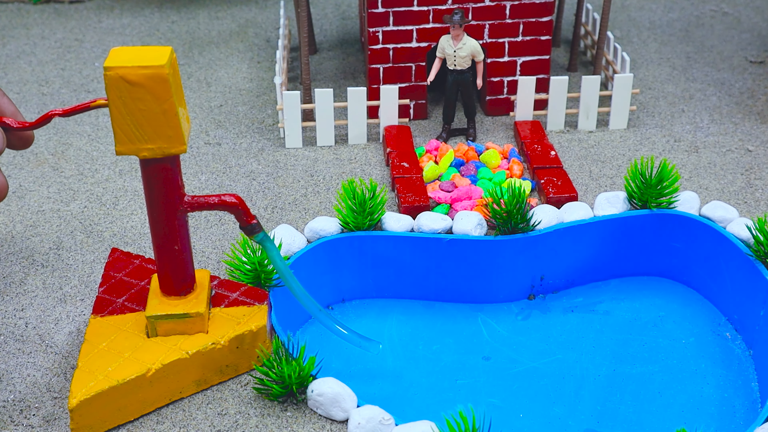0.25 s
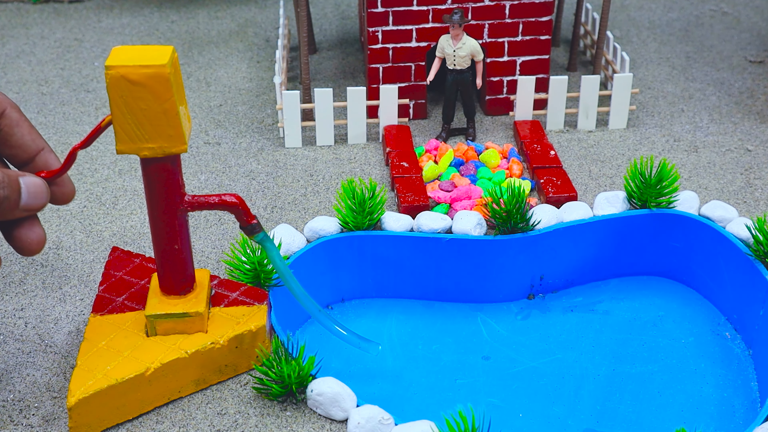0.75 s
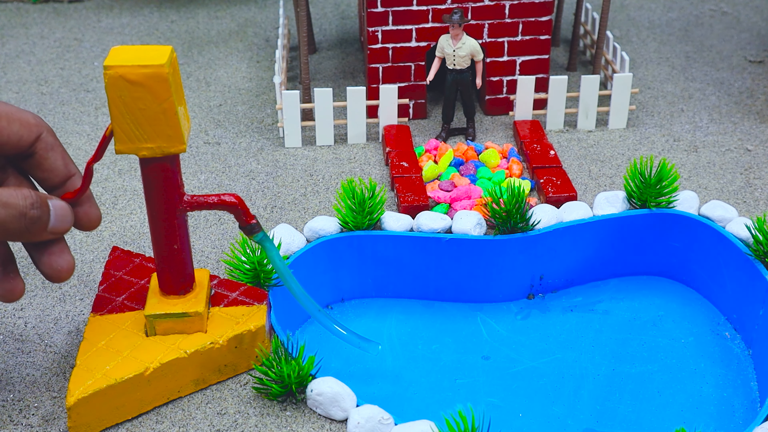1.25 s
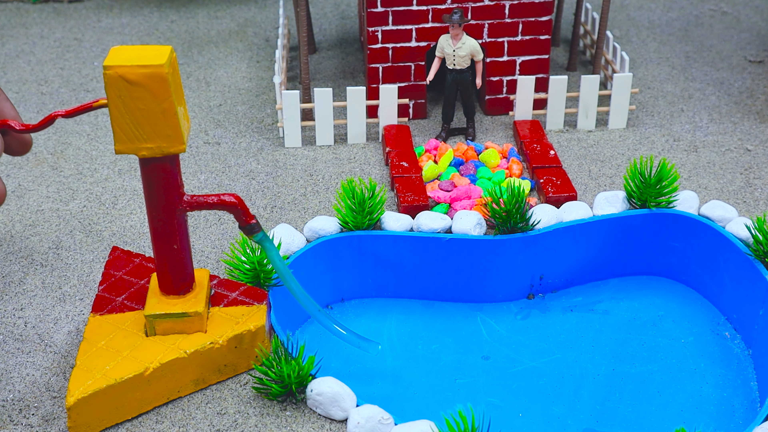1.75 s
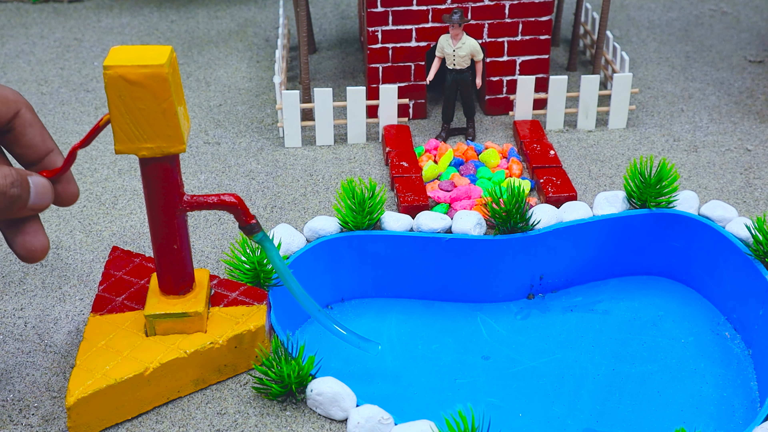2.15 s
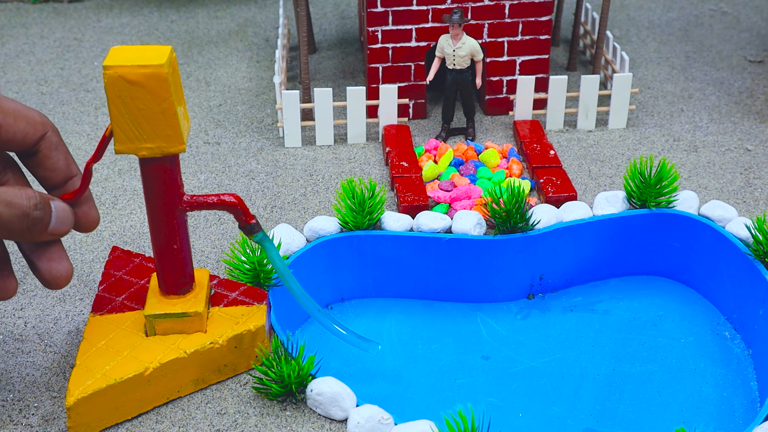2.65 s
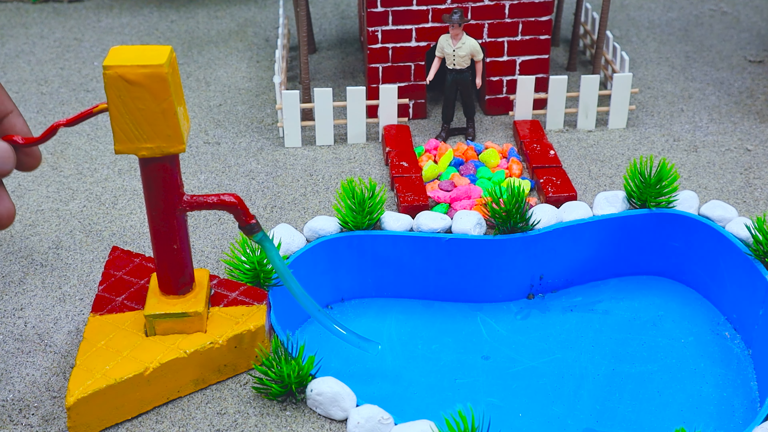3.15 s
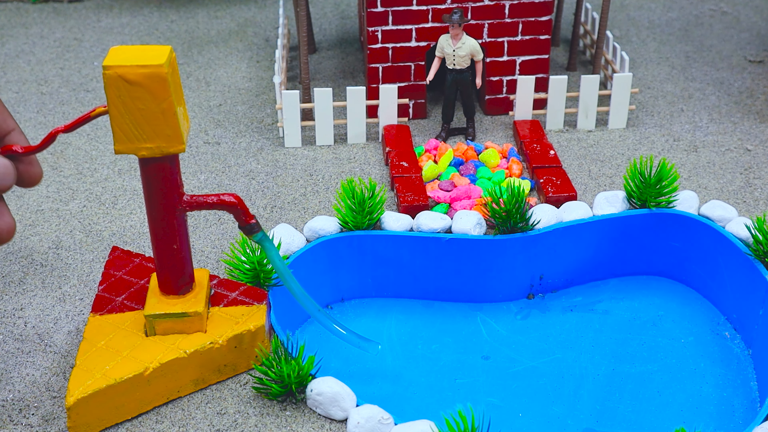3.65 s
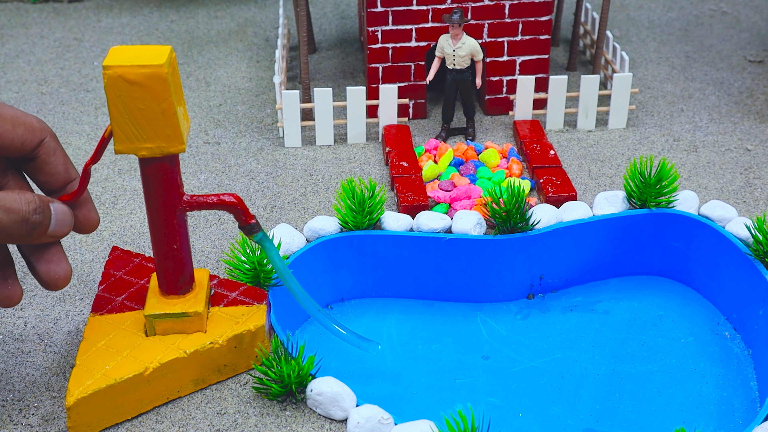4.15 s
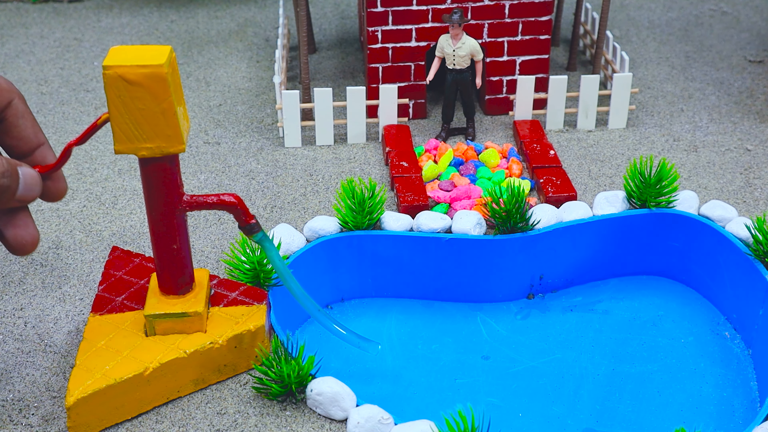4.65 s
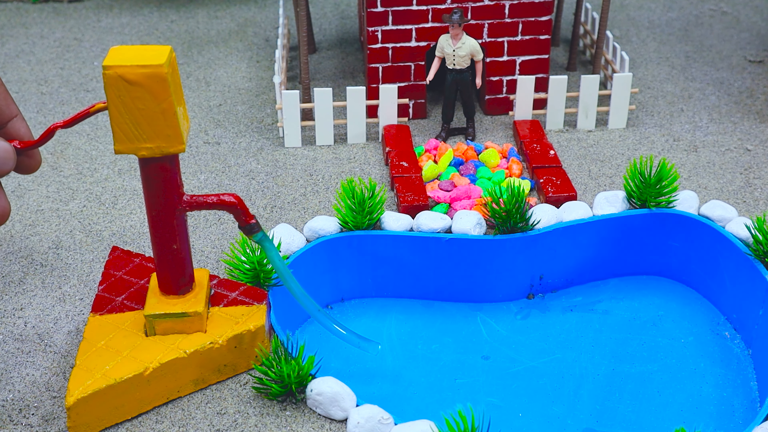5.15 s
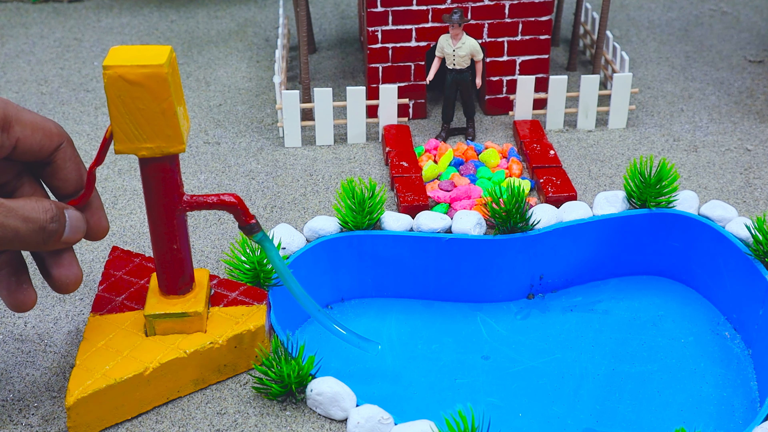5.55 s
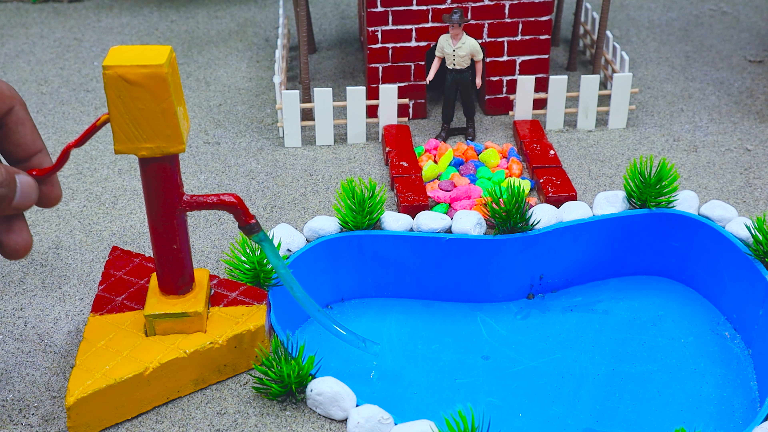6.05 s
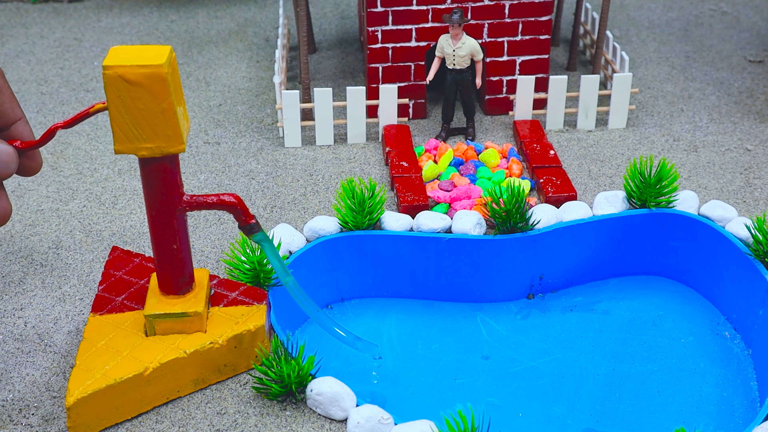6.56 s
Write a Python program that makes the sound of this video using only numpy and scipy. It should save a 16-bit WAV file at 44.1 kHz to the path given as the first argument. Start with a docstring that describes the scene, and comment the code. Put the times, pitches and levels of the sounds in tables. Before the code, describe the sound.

Bright birdsong with trills and echo over light pump clicks and thin dribbling water, ending in a sudden close gurgling splash.

```python
"""Beside a plastic pond a toy hand pump is worked close to the microphone: knocks, ticks, clacks and squeaks
come from decaying tones, gliding tones and noise bursts; a thin stream trickles as small bubbles and noise.
A songbird farther off whistles and chirps in gliding sines, with an echo and a long diffuse tail.
Near the end the water breaks into a splash of bubbles, slaps and glugs over a low rumble."""
import sys
import numpy as np
from scipy import signal
from scipy.fft import rfft, irfft, next_fast_len
from scipy.io import wavfile

SR = 44100
rng = np.random.default_rng(int(sys.argv[2]) if len(sys.argv) > 2 else 0)


def waveform_to_disk(signal):
    """Save audio, clipped to [-1, 1], as 16-bit WAV at the path in sys.argv[1]."""
    frames = np.transpose(np.atleast_2d(signal))
    scaled = np.clip(frames, -1, 1) * 32767
    samples = np.round(scaled).astype(np.int16)
    wavfile.write(sys.argv[1], SR, samples)


N = 300321
TIME = np.arange(N) / SR

# All table levels are relative; the layers add their own trims.
# The handle hits its stops. Each row: start in seconds, force in dB, hollow body in dB,
# casing ring in dB, thump of the base in dB.
KNOCKS = [(.143, -37, -55, -48, -32.5), (.167, -33.5, -35.5, -39, -48), (.274, -42, -42, -56, -39),
          (.372, -33, -39, -24.5, -30.5), (.728, -27, -38, -43, -31.5), (.8, -35, -29.5, -30, -42),
          (.83, -31, -39, -37, -34), (1.001, -37.5, -27.5, -23.5, -34), (2.299, -40, -38, -51, -37),
          (2.484, -40.5, -45, -63, -36), (2.576, -36.5, -41, -23.5, -42), (2.926, -28, -37.5, -39, -37),
          (2.948, -29, -43, -34, -31.5), (3.221, -43, -44, -37, -53), (4.585, -39, -44, -50, -40),
          (4.901, -37, -44.5, -30.5, -36.5), (5.291, -33, -29.5, -38, -34.5), (5.364, -35, -46, -39, -35.5),
          (5.402, -35, -40, -25, -33), (5.551, -39, -41, -33, -38)]
# Light ticks of the linkage. Each row: start in seconds, level in dB.
TICKS = [(.065, -26.5), (.118, -29), (.165, -20.5), (.83, -16), (.944, -24), (2.065, -30), (2.116, -27),
         (2.238, -18.5), (2.337, -15.5), (3.13, -26.5), (4.432, -25), (4.522, -20.5), (4.584, -26),
         (4.632, -14), (5.363, -23.5)]
# Large single bubbles. Each row: start in seconds, level in dB, starting pitch in Hz.
PLOPS = [(4.734, -26, 2880), (4.859, -28, 1400), (5.126, -30.5, 2150), (6.086, -23, 2380),
         (6.097, -21, 776), (6.151, -24.5, 2540), (6.186, -18, 2450), (6.305, -23, 1063), (6.336, -24, 777),
         (6.392, -22, 2440), (6.4, -17.5, 1180), (6.425, -16.5, 1594), (6.542, -18, 1123),
         (6.574, -11.5, 2880), (6.629, -15, 2540), (6.697, -18, 3070), (6.799, -20, 1060)]
# Ringing of the pump casing. Each row: resonance in Hz, width in Hz, level in dB.
CASING = [(727, 133, -3), (1136, 260, 1.5), (2117, 200, 3), (3140, 180, 1), (3770, 800, -6.5),
          (5500, 710, -8.5)]
BODY_HZ, BODY_T60_S, THUMP_HZ = 397.6, 0.16, 74
RING_HZ, RING_T60_S = 1224, 0.068
KNOCK_CRACK_HZ = 1390  # sets the crack band, from 0.5 to 0.94 of this
# Strength of the thin stream. Each row: time in seconds, bubbling in dB, spray in dB.
TRICKLE = [(0.0, -53.5, -69), (0.62, -57.5, -71), (0.92, -53.5, -67.5), (1.12, -57, -72),
           (1.55, -59.5, -71), (1.8, -53.5, -66.5), (2.26, -52.5, -63.5), (2.51, -54.5, -69.5),
           (2.74, -56, -74), (2.89, -56, -68.5), (3.36, -59.5, -66.5), (3.72, -62.5, -72),
           (3.86, -57, -69.5), (4.61, -52.5, -68.5), (5.65, -61, -70.5), (6.0, -60, -70)]
# Strength of the full stream. Each row: time in seconds, bubbling in dB, spray in dB.
SPLASH = [(6.03, -38.5, -52), (6.25, -37, -57.5), (6.4, -33, -54), (6.6, -36, -52), (6.81, -37, -56)]
SPLASH_START_S = 6.028
# Colour of the thin stream. Each row: frequency in Hz, density in dB per Hz.
TRICKLE_COLOUR = [(120, -3), (200, -6), (400, 3), (507, 1.5), (744, 0), (1070, -3), (1410, -6), (3380, 2.5),
                  (4060, -3), (5050, -13.5), (6290, -17.5), (15700, -52)]
# Colour of the full stream. Each row: frequency in Hz, density in dB per Hz.
SPLASH_COLOUR = [(200, -32), (450, -2), (800, 0.5), (1300, 0), (2500, -3.5), (4000, -7.5), (7000, -15),
                 (10000, -27.5), (15000, -20.5)]
# Colour of the spray. Each row: frequency in Hz, density in dB per Hz.
SPRAY_COLOUR = [(2000, -41), (4500, 2.5), (7000, 3.5), (10000, -2.5), (15500, -12)]
# Colour of the low rumble. Each row: frequency in Hz, density in dB per Hz.
RUMBLE_COLOUR = [(20, 0), (40, -7.5), (70, -3), (110, -7.5), (180, -12.5), (300, -18.5), (600, -41),
                 (2000, -72)]
# Open air round the bird. Each row: frequency in Hz, time to fall 60 dB in seconds.
AIR_T60 = [(2000, 0.36), (4000, 0.76), (6000, 0.99), (8500, 0.34)]
CUTOFF_HZ = 15800
# The song's level tilts between left and right over time. Each row: time in seconds, left minus right in dB.
BIRD_PAN = [(0.0, -4), (0.15, 7), (0.24, -11), (0.36, 7), (0.49, -1.5), (0.57, 9), (0.72, 4.5), (1.15, 5.5),
            (1.23, 2), (1.7, 6), (2.54, -3.5), (3.92, -4.0), (5.38, -7), (5.64, -10), (5.81, 1), (6.8, 1.0)]
# Drops slapping the pond. Each row: start in seconds, level in dB.
SLAPS = [(6.037, -14.5), (6.047, -15.5), (6.121, -19.5), (6.272, -20), (6.338, -28), (6.399, -16),
         (6.426, -6.5), (6.509, -16), (6.542, -24), (6.63, -7), (6.653, -18), (6.762, -30)]
# Squeaks of the handle pivot. Each row: start in seconds, length in seconds, start pitch in Hz,
# end pitch in Hz, level in dB.
SQUEAKS = [(0.831, 0.036, 2244, 1950, -24.5), (3.011, 0.023, 2187, 1970, -28)]
# Soft low swells. Each row: middle in seconds, length in seconds, centre in Hz, width in Hz, level in dB.
PUFFS = [(.35, .09, 400, 30, -43), (.55, .11, 377, 60, -43.5), (1.769, 0.24, 617, 503, -47),
         (3.783, .12, 646, 500, -44.5), (4.35, .9, 184, 44.7, -59.5), (5.2, 0.87, 138, 34.8, -56.5)]
# Drops pattering on the pond as the stream wavers. Each row: time in seconds, level in dB.
PATTER = [(0, -70), (1.7, -56.5), (2.4, -49.5), (2.8, -54.5), (3.7, -66), (3.95, -50.5), (4.55, -43),
          (5.2, -53.5), (6.0, -72)]
# Colour of the patter. Each row: frequency in Hz, density in dB per Hz.
PATTER_COLOUR = [(600, -30), (1200, -1), (1800, 9), (3000, -5.5), (5000, -4.5), (7000, -14.5),
                 (12000, -23.5)]
# The bird's held whistles. Each row: start in seconds, length in seconds, middle pitch in Hz,
# level in dB, warble as a share of pitch (a slight common warble is added to all notes).
WHISTLES = [(.203, 0.092, 3883, -29, 0.0049), (.727, 0.062, 3893, -23.5, 0.012),
            (1.194, 0.077, 3896, -27, 0.004), (2.404, 0.35, 8570, -39.5, 0.0098),
            (2.479, 0.16, 7050, -45, .015), (2.992, 0.056, 4416, -27, 0.012), (3.1, 0.12, 3482, -31, 0),
            (3.133, 0.066, 3982, -30, 0), (3.63, 0.073, 3943, -31, 0), (4.144, 0.059, 3896, -28.5, 0.0069),
            (5.599, .055, 3250, -43.5, 0.045), (5.712, .032, 4900, -45, 0.031)]
# Slurs that drop a little and level out. Each row: start in seconds, length in seconds,
# middle pitch in Hz, level in dB, warble as a share of pitch.
SLURS = [(0, .017, 4440, -31.5, 0.036), (.07, 0.041, 7200, -50, .034), (.125, .1, 5400, -41.5, 0.057),
         (.327, .04, 7120, -47, 0.033), (.396, .065, 5070, -35.5, 0.063), (.419, .08, 4415, -30, .02),
         (.915, .068, 4520, -29.5, 0.033), (1.2, .047, 4680, -37.5, 0.093), (3.05, 0.0577, 3494, -28, .002),
         (3.353, .076, 4453, -33, 0.016), (3.854, .051, 4500, -29, 0.026),
         (4.384, .061, 4450, -32.5, 0.023)]
# Slides down. Each row: start in seconds, length in seconds, middle pitch in Hz, level in dB,
# warble as a share of pitch.
SLIDES = [(1.427, 0.079, 4410, -30.5, 0.038), (3.395, .135, 7550, -36.5, .011),
          (3.561, .055, 7900, -44, .005), (3.617, .063, 6650, -34.5, 0.029),
          (3.745, 0.067, 5700, -34, 0.03), (3.951, .026, 3640, -28.5, 0.079),
          (4.03, 0.039, 3490, -30, 0.059), (5.454, 0.064, 3405, -42, 0.073)]
# Steep buzzy sweeps down. Each row: start in seconds, length in seconds, middle pitch in Hz,
# level in dB, warble as a share of pitch.
SWEEPS = [(1.283, 0.052, 3110, -27.5, .035), (1.463, .023, 6150, -40.5, .06),
          (1.493, 0.08, 3400, -26, .045), (1.696, 0.041, 6280, -40.5, 0.053),
          (1.718, 0.095, 3622, -26, 0.079), (1.99, .12, 2833, -30.5, 0.088),
          (3.861, 0.03, 3590, -35, 0.088)]
# Quick flicks up. Each row: start in seconds, length in seconds, middle pitch in Hz, level in dB,
# warble as a share of pitch.
FLICKS = [(1.0, 0.056, 3020, -41, .01), (1.954, .044, 3236, -23.5, 0.043)]
# Glide of each kind: start and end in semitones from the middle pitch.
WHISTLE_SHAPE, SLUR_SHAPE, SLIDE_SHAPE = (0.257, -0.245), (1.315, -0.023), (2, -1.19)
SWEEP_SHAPE, FLICK_SHAPE = (3.4, -10.5), (-4.5, 3.7)
# Soft motif for a trill. Each row: delay in seconds, length in seconds, start pitch in Hz,
# middle pitch in Hz, end pitch in Hz, level in dB, warble as a share of pitch.
SOFT_MOTIF = [(0, .02, 4450, 3670, 3000, -4, 0.018), (.028, .048, 2874, 3350, 4270, -0.5, 0.013)]
# Hooked motif for a trill. Each row: as in the soft motif (seconds, seconds, Hz, Hz, Hz, dB, share).
HOOK_MOTIF = [(0, .036, 4750, 4000, 3920, 0, 0.015)]
# High motif for a trill. Each row: as in the soft motif (seconds, seconds, Hz, Hz, Hz, dB, share).
HIGH_MOTIF = [(0, .031, 4700, 6450, 7980, -0.17, 0.06), (.077, .027, 6550, 5950, 5370, -0.13, .03)]
# Loud motif for a trill. Each row: as in the soft motif (seconds, seconds, Hz, Hz, Hz, dB, share).
LOUD_MOTIF = [(0, 0.02, 5270, 5110, 4940, -5.5, .025), (.038, .024, 5300, 4025, 3310, 1, 0.0067),
              (.066, .033, 3600, 4300, 5850, -0.5, .04)]
HOOK_START_S, HOOK_PERIOD_S = .545, .075
# Play in the linkage takes up with a dry clack. Each row: start in seconds, force in dB,
# crack reference in Hz (its band runs from 0.5 to 0.94 of this).
CLACKS = [(.183, -33.5, 1480), (.741, -29, 3900), (2.335, -34.5, 2240), (2.353, -32.5, 2300),
          (2.898, -38.5, 2080), (3.017, -30, 3600), (4.632, -35.5, 5000), (4.655, -32, 3170),
          (5.284, -34.5, 3495)]
# Strength of the low rumble. Each row: time in seconds, level in dB.
RUMBLE = [(0, -53), (.4, -50), (.9, -55.5), (1.2, -61.5), (1.9, -64.5), (2.3, -54), (2.8, -53),
          (3.7, -66.5), (4.4, -58.5), (5.05, -53), (5.7, -59), (6, -63)]
# Air pockets dug by the full stream, whose pitch bends as they open and close. Each row: start in seconds,
# length in seconds, start pitch in Hz, end pitch in Hz, level in dB.
GLUGS = [(6.1, 0.048, 787, 515, -30.5), (6.304, .025, 1100, 680, -27.5), (6.324, .03, 600, 855, -30.5),
         (6.4, 0.0403, 1245, 963, -29), (6.43, .07, 704, 513, -33.5), (6.521, 0.044, 896, 1516, -25),
         (6.625, 0.0303, 1450, 994, -30.5), (6.67, .028, 857, 950, -30.5), (6.769, 0.039, 846, 1153, -30.5)]


def from_db(db):
    """Decibels to gain."""
    return 10 ** (np.asarray(db) / 20)


def rms_one(x):
    """Scale to unit power."""
    return x / np.sqrt(np.mean(x ** 2) + 1e-20)


def in_time(rows):
    """Curve rows to one value per sample and column."""
    s, *columns = np.transpose(rows)
    return [np.interp(TIME, s, c) for c in columns]


def at_hz(points, hz):
    """Read a table on a log-frequency axis."""
    table_hz, values = np.array(points).T
    return np.interp(np.log(hz + 1e-9), np.log(table_hz), values)


def add(track, s, sound):
    """Mix a sound in at a time."""
    i = max(int(s * SR), 0)
    part = sound[..., :max(N - i, 0)]
    track[..., i:i + part.shape[-1]] += part


def band(x, low_hz, high_hz):
    """Gentle band-pass."""
    sos = signal.butter(2, [low_hz, min(high_hz, .45 * SR)], "band", fs=SR, output="sos")
    return signal.sosfilt(sos, x)


def resonance(x, hz, width_hz):
    """Two-pole resonance with gain 1 on top."""
    r = np.exp(-np.pi * width_hz / SR)
    top = np.array([1, 0, -1]) * (1 - r * r) / 2
    return signal.lfilter(top, [1, -2 * r * np.cos(2 * np.pi * hz / SR), r * r], x)


def spread(pair, side_db):
    """A middle and a side signal to left and right."""
    return pair[0] + from_db(side_db) * pair[1] * np.array([[1], [-1]])


def pan(db):
    """Left and right gains for a level difference."""
    return from_db(np.array([[db], [-db]]) / 2)


def wash(colour, side_db):
    """Stereo noise of a given colour that falls away below its lowest point."""
    size = next_fast_len(N, real=True)
    hz = np.arange(size // 2 + 1) * SR / size
    gain = from_db(at_hz(colour, hz)) * np.minimum(hz / colour[0][0], 1) ** 2
    noise = irfft(rfft(rng.standard_normal((2, size))) * gain, size)[:, :N]
    return rms_one(spread(noise, side_db))


def reverberate(x, t60_table, delay_s, side_db):
    """Diffuse stereo tail that builds up over delay_s and whose bands die at their own rates."""
    t = TIME[:SR]
    edges = np.geomspace(150, 15000, 9)
    tail = np.zeros((2, SR))
    for low_hz, high_hz in zip(edges, edges[1:]):
        t60 = at_hz(t60_table, np.sqrt(low_hz * high_hz))
        tail += band(rng.standard_normal((2, SR)), low_hz, high_hz) * from_db(-60 * t / t60)
    tail = spread(tail, side_db) * np.minimum(t / delay_s, 1)
    return signal.fftconvolve(x[None], rms_one(tail) / np.sqrt(SR), axes=1)[:, :N]


def trill(motif, start_s, period_s, level_db, growth_db, count):
    """A motif repeats at an even pace, louder each time."""
    return [(start_s + k * period_s + delay, length, start_hz, middle_hz, end_hz,
             level_db + k * growth_db + db, warble)
            for k in range(count)
            for delay, length, start_hz, middle_hz, end_hz, db, warble in motif]


def notes(rows, shape):
    """Notes of one kind share their glide."""
    start, end = shape
    return [(s, length, hz * 2 ** (start / 12), hz, hz * 2 ** (end / 12), db, warble)
            for s, length, hz, db, warble in rows]


def song():
    """Two trills open the song, single notes run among and after them, a high and a loud trill close it."""
    opening = (trill(SOFT_MOTIF, start_s=-0.013, period_s=.17, level_db=-43, growth_db=1.3, count=4)
               + trill(HOOK_MOTIF, HOOK_START_S, HOOK_PERIOD_S, level_db=-31, growth_db=0.2, count=9))
    singles = (notes(WHISTLES, WHISTLE_SHAPE) + notes(SLURS, SLUR_SHAPE) + notes(SLIDES, SLIDE_SHAPE)
               + notes(SWEEPS, SWEEP_SHAPE) + notes(FLICKS, FLICK_SHAPE))
    closing = (trill(HIGH_MOTIF, start_s=5.803, period_s=.106, level_db=-41, growth_db=2.0, count=6)
               + trill(LOUD_MOTIF, start_s=6.426, period_s=.168, level_db=-17.5, growth_db=0.5, count=3))
    return opening + singles + closing


def bird(warble_hz=230, swell_s=.008, direct_db=-1, echo_s=.039, echo_db=-12.0, tail_db=-2, fade_share=0.17):
    """Each note is a near sine gliding through three pitches; buzzy notes warble fast."""
    voice = np.zeros(N)
    for s, length, start_hz, middle_hz, end_hz, db, warble in song():
        t = TIME[:int((length + swell_s) * SR)]
        curve = np.polyfit([0, .5, 1], [start_hz, middle_hz, end_hz], 2)
        glide = np.polyval(curve, (t - swell_s / 2) / length)
        flutter = rms_one(band(rng.standard_normal(SR // 2), warble_hz / 2, warble_hz * 2))[-len(t):]
        pitch = glide * (1 + (warble + 0.0019) * flutter)
        effort = np.minimum(middle_hz / glide, 1) ** 2   # the voice thins at the top of a sweep
        fade = np.clip(np.minimum(t, t[-1] - t) / (swell_s + fade_share * length), 0, 1)
        swell = effort * np.sin(np.pi / 2 * fade) ** 2
        add(voice, s - swell_s / 2, from_db(db) * swell * np.sin(2 * np.pi * np.cumsum(pitch) / SR))
    # one hard reflection trails every note, beside the diffuse tail
    echo = np.concatenate([np.zeros(int(echo_s * SR)), voice])[:N]
    heard = from_db(direct_db) * voice + from_db(echo_db) * echo
    heard = heard + from_db(tail_db) * reverberate(voice, AIR_T60, delay_s=0.0027, side_db=-4)
    return heard * pan(1) ** in_time(BIRD_PAN)[0]


def bubble(hz, cycles, rise):
    """A bubble rings and dies over some cycles; its pitch climbs, or falls if rise is negative."""
    age = np.linspace(0, 1, int(cycles / hz * SR) + 2)
    tone = np.sin(2 * np.pi * cycles * (age + rise * age ** 2 / 2))
    return tone * from_db(-60 * age) * (1 - np.exp(-age * cycles))


def bubbling(colour, per_s, size_db, cycles, start_s):
    """A swarm of small bubbles of random size and pitch; unit power once it runs."""
    out = np.zeros((2, N))
    running_s = N / SR - start_s
    draws = rng.random((6000, 5))
    for when, pitch, size, place, life in draws[:int(per_s * running_s)]:
        hz = 500 * 24 ** pitch
        db = at_hz(colour, hz) + 20 * np.log10(hz) + size_db * min(-np.log(1 - size), 3.5)
        sound = from_db(db) * bubble(hz, cycles * (.5 + life), rise=0.39)
        add(out, start_s + when * running_s, sound * pan(8 * (place - .5)))
    return out / np.sqrt(np.mean(out[:, int(start_s * SR):] ** 2))


def trickle(bubbles_db=5, wash_db=8, spray_db=14, rumble_db=0):
    """The thin stream, as bubbles and noise, patters into the pond over a faint low rumble."""
    flow, spray = from_db(in_time(TRICKLE))
    fizz = bubbling(TRICKLE_COLOUR, per_s=800, size_db=3.5, cycles=9, start_s=0)
    water = from_db(bubbles_db) * fizz + from_db(wash_db) * wash(TRICKLE_COLOUR, side_db=-4.0)
    mist = from_db(spray_db) * wash(SPRAY_COLOUR, side_db=3.5)
    rumble = from_db(in_time(RUMBLE)[0] + rumble_db) * wash(RUMBLE_COLOUR, side_db=-5)
    return flow * water + spray * mist + rumble


def patter(per_s=420, size_db=3, cycles=18):
    """Scattered small drops ring as bubbles on the water surface."""
    return from_db(in_time(PATTER)[0]) * bubbling(PATTER_COLOUR, per_s, size_db, cycles, start_s=0)


def snaps(table, t60, rise_s, level_db, low_hz, high_hz, side_db):
    """Short bright noise bursts, one for each row."""
    out, t = np.zeros((2, N)), TIME[:SR // 10]
    for s, db in table:
        noise = band(rng.standard_normal((2, len(t))), low_hz, high_hz)
        snap = spread(rms_one(band(noise, 500, 10900)), side_db)
        add(out, s, from_db(db + level_db - 60 * t / t60) * snap * (1 - np.exp(-t / rise_s)))
    return out


def linkage(follow_db=6):
    """The linkage ticks on its own and with every knock and clack."""
    ticks = TICKS + [(s, force + follow_db) for s, force, *_ in KNOCKS + CLACKS]
    return snaps(ticks, t60=0.03, rise_s=0.0038, level_db=-2.5, low_hz=2240, high_hz=7030, side_db=-1.0)


def contact(force_db, crack_db, crack_hz, rattle_hz, clatter_t60, rattle_db,
            crack_t60=0.0044, grain_db=2.0, clatter_db=-2):
    """A brief crack, while loose parts chatter on and ring the casing."""
    t = TIME[:SR // 4]
    white = rng.standard_normal((2, len(t)))
    chatter = white * from_db(grain_db * rng.standard_normal(len(t)) - 60 * t / clatter_t60)
    casing = from_db(rattle_db) * band(chatter, 210, rattle_hz)
    for k, (hz, width, db) in enumerate(CASING):
        casing += (-1) ** k * from_db(db) * resonance(chatter, hz, width)
    casing = casing / np.std(casing[:, :SR // 50])   # level set by its first 20 ms
    crack = rms_one(band(white, crack_hz / 2, crack_hz * 0.94)) * from_db(crack_db - 60 * t / crack_t60)
    return from_db(force_db) * spread(crack + from_db(clatter_db) * casing, side_db=-8.5)


def knocks(body_db=5, ring_db=0, thump_t60=0.12, thump_width_hz=45, balance_db=2.6):
    """Each knock rings the hollow body and the casing and thumps the base."""
    out, t = np.zeros((2, N)), TIME[:SR // 4]
    onset = 1 - np.exp(-t / 0.0023)
    for s, force, body, ring, thump in KNOCKS:
        hit = contact(force, crack_db=15.5, crack_hz=KNOCK_CRACK_HZ, rattle_hz=3800,
                      clatter_t60=0.15, rattle_db=-13)
        modes = (BODY_HZ, BODY_T60_S, body + body_db), (RING_HZ, RING_T60_S, ring + ring_db)
        for hz, t60, db in modes:
            struck_hz = hz * (1 + 0.022 * rng.standard_normal())
            hit += onset * from_db(db - 60 * t / t60) * np.sin(2 * np.pi * struck_hz * t)
        noise = rng.standard_normal((2, SR))
        base = rms_one(resonance(noise, THUMP_HZ, thump_width_hz)[:, -len(t):])
        hit += onset * from_db(thump - 60 * t / thump_t60) * spread(base, side_db=-6.5)
        add(out, s, hit * pan(balance_db))
    return out


def clacks(balance_db=3):
    """Hard, light contacts that only rattle the casing."""
    out = np.zeros((2, N))
    for s, force, hz in CLACKS:
        hit = contact(force, crack_db=10, crack_hz=hz, rattle_hz=4800, clatter_t60=0.097, rattle_db=-9)
        add(out, s, hit * pan(balance_db))
    return out


def puffs():
    """Soft swells of low band-passed noise."""
    out = np.zeros(N)
    for s, length, hz, width_hz, db in PUFFS:
        swell = np.hanning(int(length * SR))
        noise = band(rng.standard_normal(2 * SR), hz - width_hz / 2, hz + width_hz / 2)[-len(swell):]
        add(out, s - length / 2, from_db(db) * swell * rms_one(noise))
    return out


def squeaks(octave_db=-2, rough=0.0087):
    """The pivot squeaks: a falling tone, roughened by pitch jitter, with its octave."""
    out = np.zeros(N)
    for s, length, start_hz, end_hz, db in SQUEAKS:
        age = np.linspace(0, 1, int(length * SR))
        jitter = rms_one(band(rng.standard_normal(SR // 4), 80, 500))[-len(age):]
        pitch = (start_hz + (end_hz - start_hz) * age) * (1 + rough * jitter)
        phase = 2 * np.pi * np.cumsum(pitch) / SR
        tone = np.sin(phase) + from_db(octave_db) * (1 - age) * np.sin(2 * phase)
        add(out, s, from_db(db) * np.minimum(age * 20, 1) * np.sqrt(1 - age) * tone)
    return out


def plops(level_db=4, cycles=38, rise=0.088, gurgle_db=-8, gurgle_s=0.0058, lower=0.86):
    """A large bubble stands out of the flow; its cavity sheds three lower, weaker ones."""
    out = np.zeros((2, N))
    for s, db, hz in PLOPS:
        place = pan(rng.normal(0, 1.8))
        add(out, s, from_db(db + level_db) * bubble(hz, cycles, rise) * place)
        for k in range(1, 4):
            shed = from_db(db + gurgle_db) / k * bubble(hz * lower, cycles / 2, -rise)
            add(out, s + k * gurgle_s * rng.uniform(0.93, 1.0), shed * place)
    return out


def churn(boost_db=4.5, settle_s=0.012, calm_db=-1.5):
    """Every slap and large bubble stirs up the water for a moment."""
    stir = np.zeros(N)
    for s, *_ in SLAPS + PLOPS:
        add(stir, s, np.exp(-TIME[:SR // 4] / settle_s))
    return from_db(calm_db + boost_db * np.minimum(stir, 1))


def splash(bubbles_db=0, wash_db=-3, spray_db=0, droplets_db=2, rumble_db=-39, surge_db=3):
    """The full stream churns the water in quick surges and throws up fine droplets."""
    flow, spray = from_db(in_time(SPLASH)) * churn()
    surge = rms_one(from_db(surge_db * rms_one(band(rng.standard_normal(N + SR), 21, 64)[SR:])))
    fizz = bubbling(SPLASH_COLOUR, per_s=700, size_db=5.5, cycles=32.3, start_s=SPLASH_START_S)
    water = from_db(bubbles_db) * fizz + from_db(wash_db) * surge * wash(SPLASH_COLOUR, side_db=-4.0)
    droplets = bubbling(SPRAY_COLOUR, per_s=900, size_db=4.5, cycles=7, start_s=SPLASH_START_S)
    mist = from_db(droplets_db) * droplets + from_db(spray_db) * surge * wash(SPRAY_COLOUR, side_db=14)
    rumble = from_db(rumble_db) * wash(RUMBLE_COLOUR, side_db=-5)
    running = np.clip((TIME - SPLASH_START_S) / .004, 0, 1)
    return running * (flow * water + spray * mist + rumble)


def slaps():
    """Drops slap the pond as very short bright noise bursts."""
    return snaps(SLAPS, t60=0.013, rise_s=0.00068, level_db=-6.0, low_hz=1860, high_hz=8900, side_db=-8.5)


def glugs(level_db=0, wobble=0.046, wobble_hz=110):
    """An air pocket rings at a gliding pitch while its walls wobble."""
    out = np.zeros(N)
    for s, length, start_hz, end_hz, db in GLUGS:
        age = np.linspace(0, 1, int(length * SR))
        shake = rms_one(band(rng.standard_normal(SR // 2), wobble_hz / 2, wobble_hz * 2))[-len(age):]
        pitch = start_hz * (end_hz / start_hz) ** age * (1 + wobble * shake)
        tone = np.sin(2 * np.pi * np.cumsum(pitch) / SR)
        add(out, s, from_db(db + level_db) * np.sin(np.pi * np.sqrt(age)) * tone)
    return out


def scene(near_tail_db=-13):
    """Pump and water are close to the microphone, with a short tail; the bird is farther off."""
    pump = knocks() + clacks() + linkage() + squeaks()
    water = trickle() + patter() + splash() + plops() + glugs() + slaps()
    near = pump + water
    near_t60 = [(500, 0.1), (8000, 0.11)]  # Hz, seconds
    tail = reverberate(near.mean(axis=0), near_t60, delay_s=0.0059, side_db=-18.5)
    return near + from_db(near_tail_db) * tail + bird() + puffs()


def record(dry):
    """A steep low-pass cuts the top."""
    return signal.sosfilt(signal.ellip(10, .2, 80, CUTOFF_HZ, fs=SR, output="sos"), dry)


dry = scene()
out = record(dry)
waveform_to_disk(out)
```